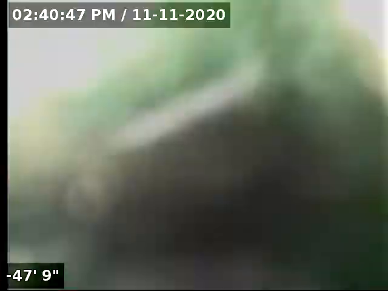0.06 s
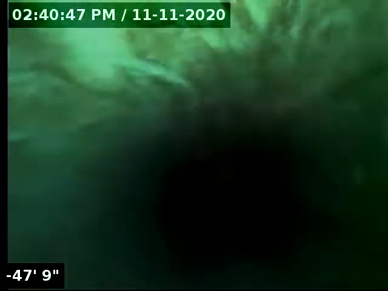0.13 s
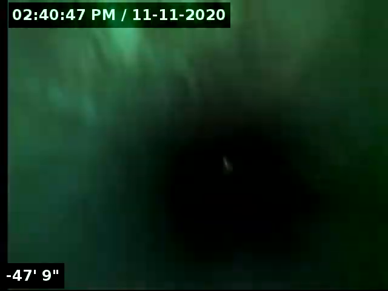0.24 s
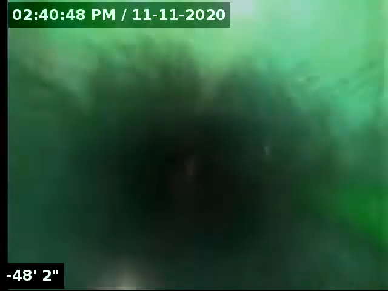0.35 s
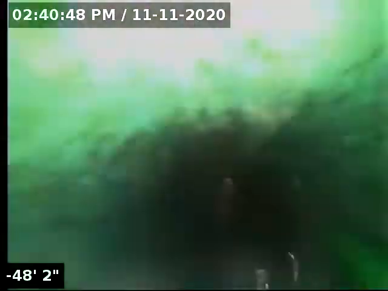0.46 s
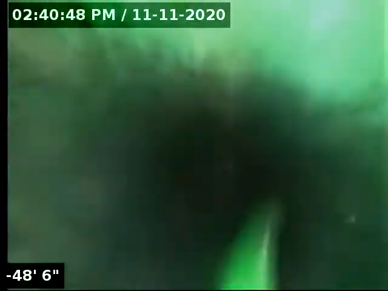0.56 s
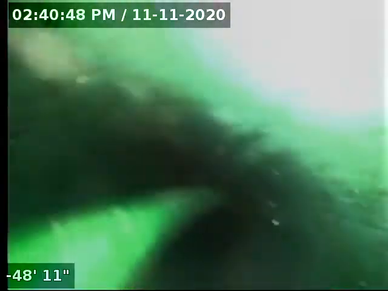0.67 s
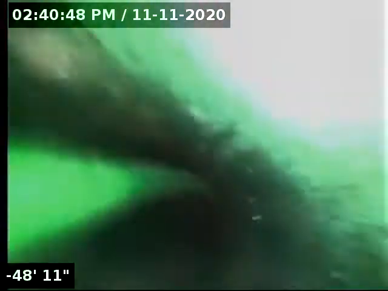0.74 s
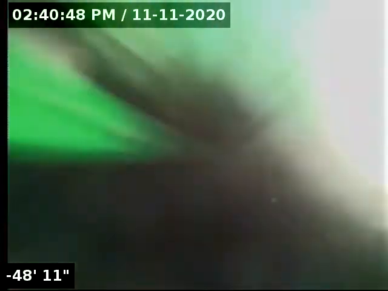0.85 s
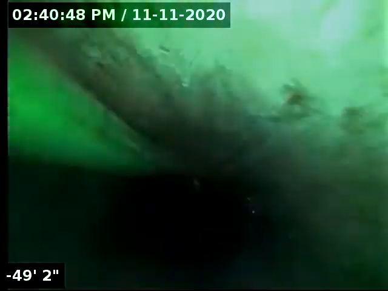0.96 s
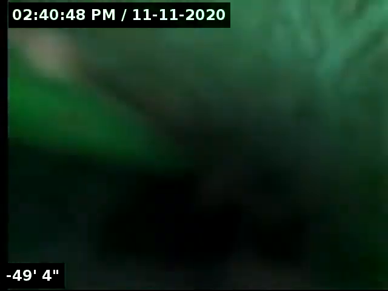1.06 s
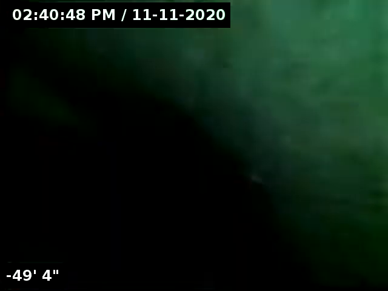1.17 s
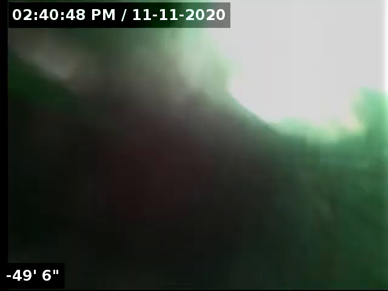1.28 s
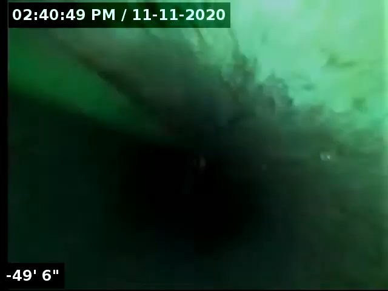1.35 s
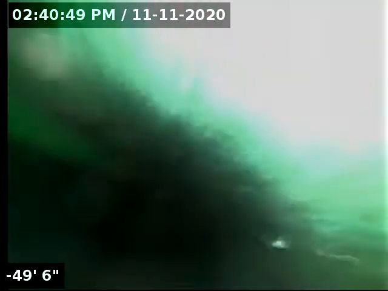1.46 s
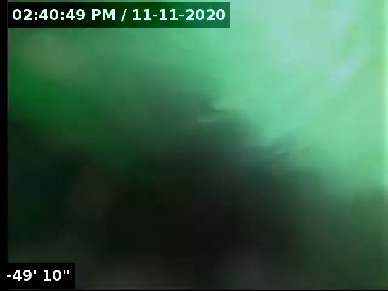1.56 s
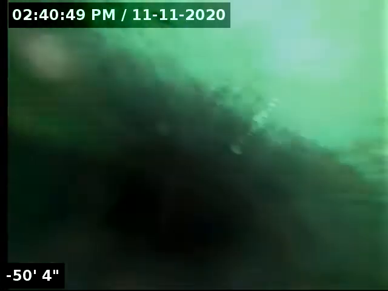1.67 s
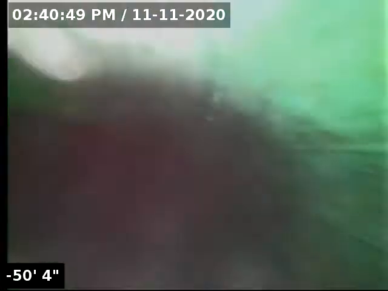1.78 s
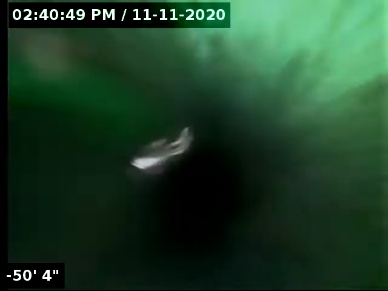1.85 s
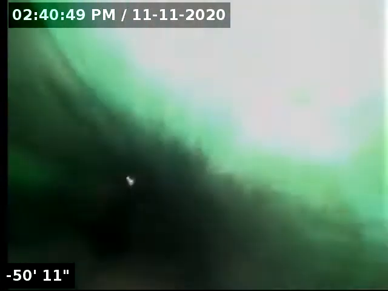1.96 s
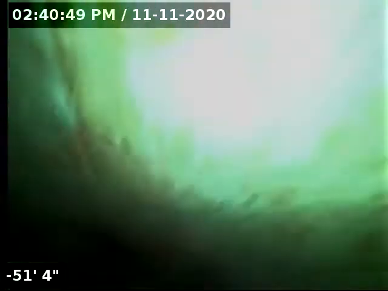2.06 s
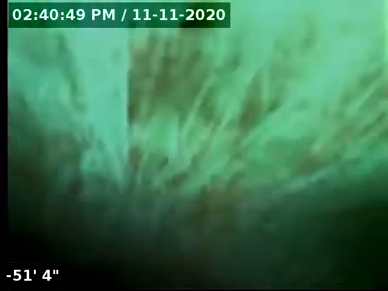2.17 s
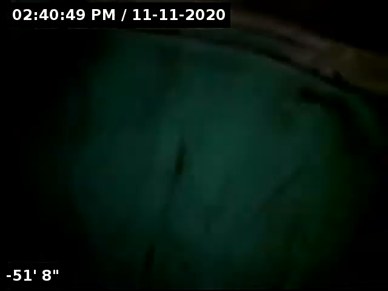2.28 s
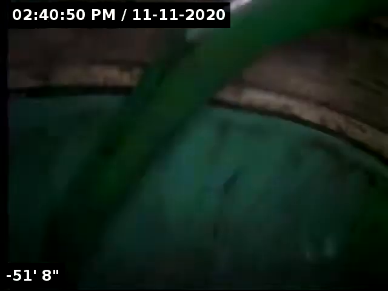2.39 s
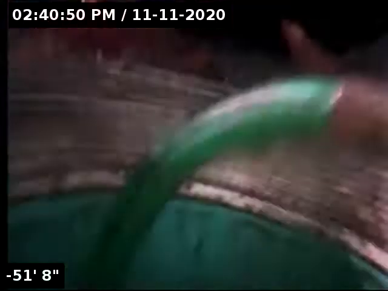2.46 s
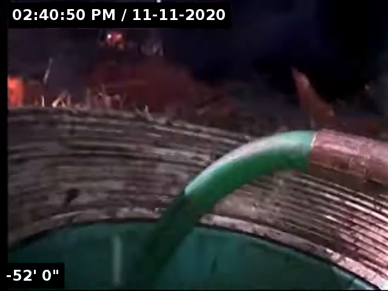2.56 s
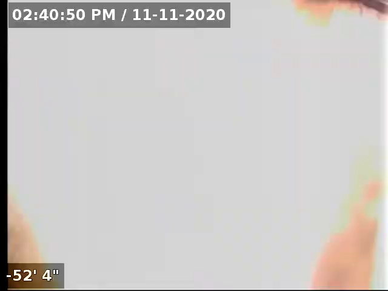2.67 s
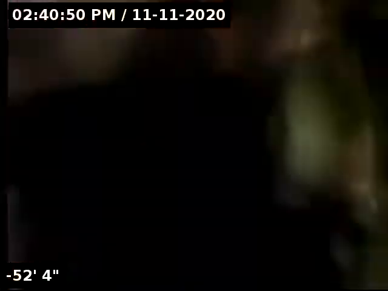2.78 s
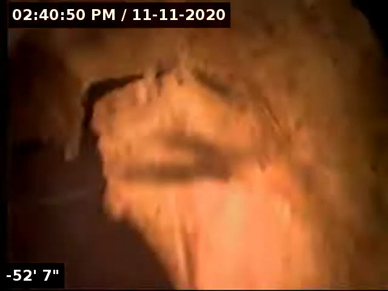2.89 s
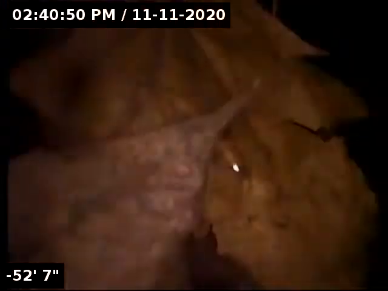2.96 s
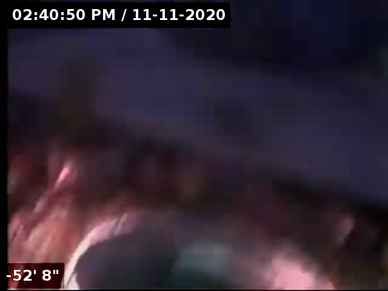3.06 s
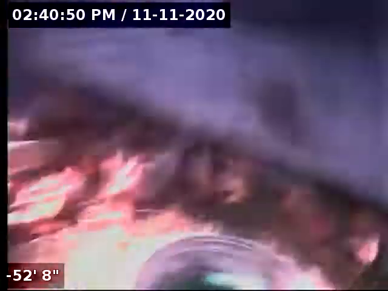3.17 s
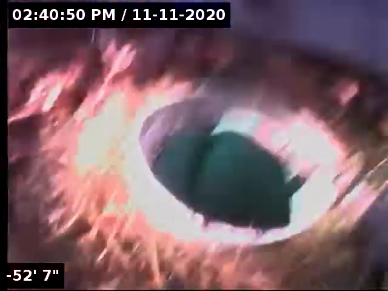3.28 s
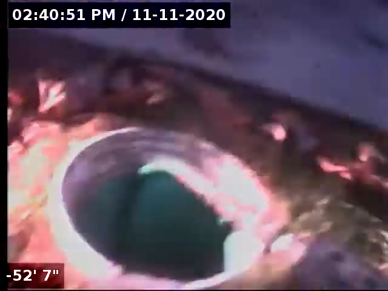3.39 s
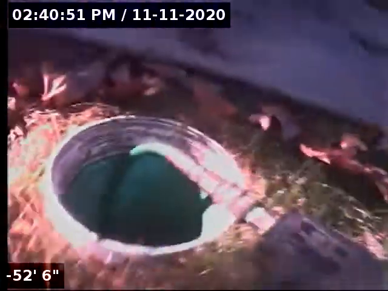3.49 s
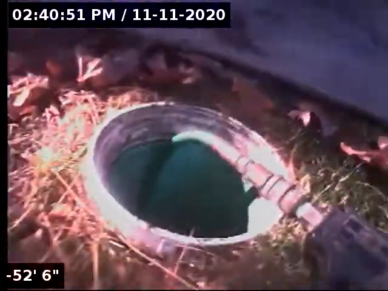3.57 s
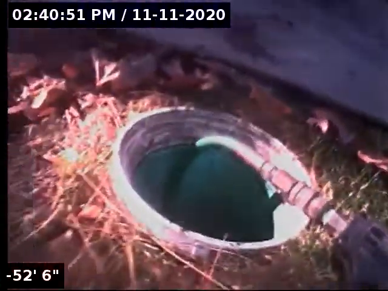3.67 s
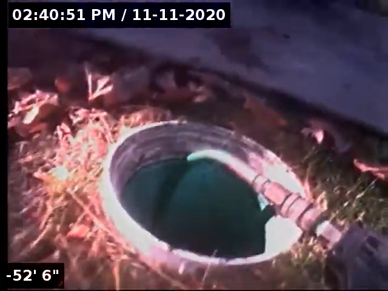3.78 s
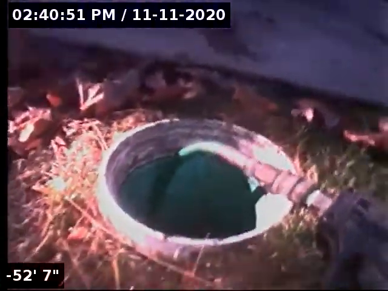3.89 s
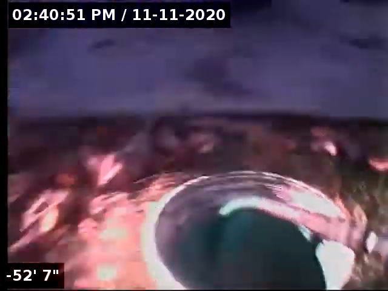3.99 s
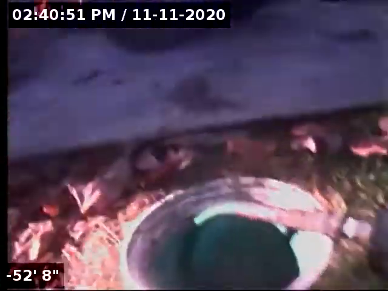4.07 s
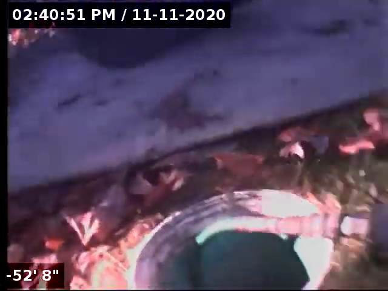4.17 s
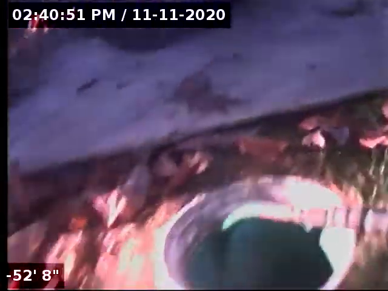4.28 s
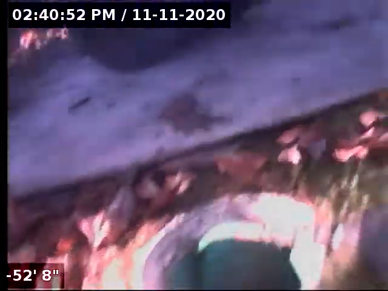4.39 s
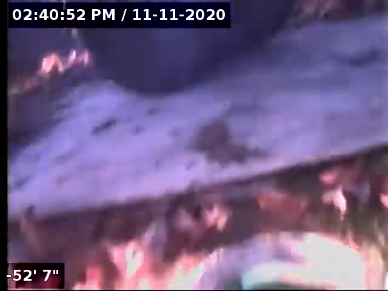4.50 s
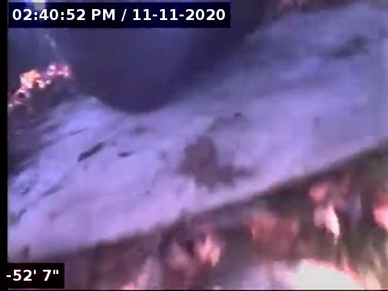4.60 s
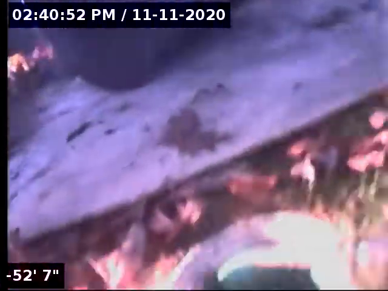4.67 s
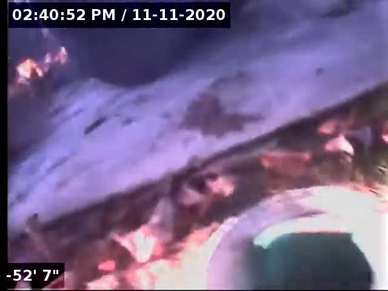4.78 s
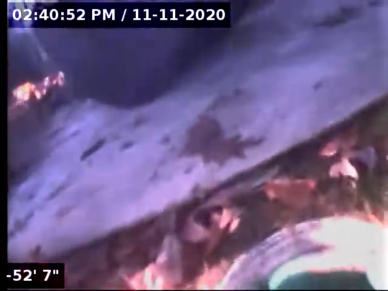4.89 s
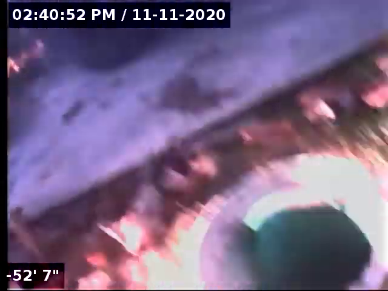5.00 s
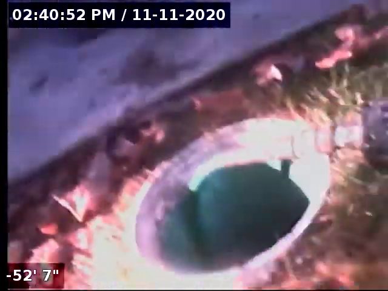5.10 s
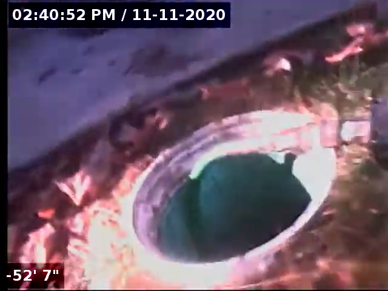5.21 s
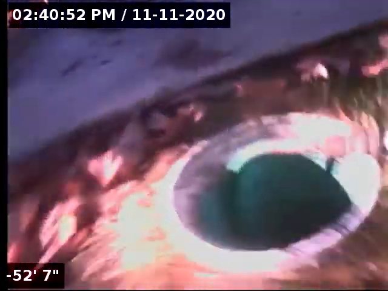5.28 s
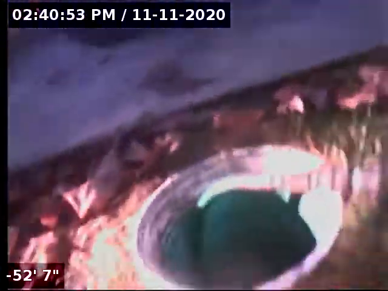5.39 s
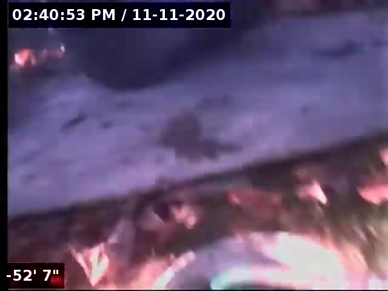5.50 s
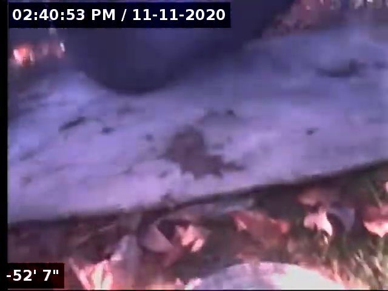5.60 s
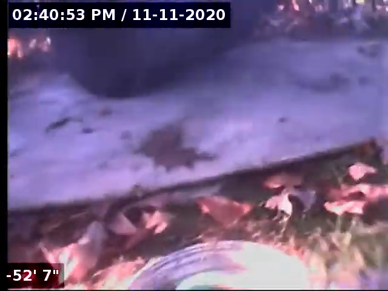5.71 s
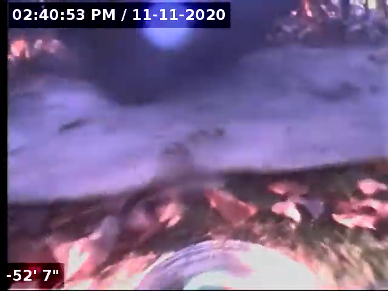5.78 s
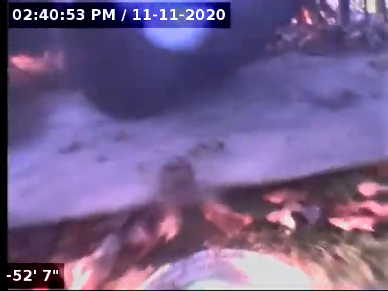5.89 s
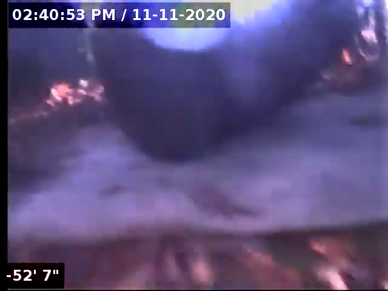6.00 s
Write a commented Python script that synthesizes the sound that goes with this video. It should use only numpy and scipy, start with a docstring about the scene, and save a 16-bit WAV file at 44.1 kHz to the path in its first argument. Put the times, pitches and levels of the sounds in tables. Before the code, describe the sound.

A steady, muffled rush with thin electronic hiss runs throughout, heard by one close, dull, slightly overloaded microphone. From 0 to 2 seconds a hard camera head is dragged through a plastic drain pipe: gritty scraping, low rumbling bumps, and cable swishes in short strokes whose tone climbs. Soft hollow knocks at 0.2 and 0.36 give way to stronger ones near 1.0, 1.25, 1.55 and 1.86. At about 2.05 a sharp knock leads into a dense, dry clatter over the rim until 2.6, with a brief hollow groan near 2.4. A boomy knock lands at 2.75, a loud one at 3.18, then scraping and small bumps to 3.45. After a lull, the loudest hollow knock strikes at 4.0, followed by two cable swishes and soft scuffs until 4.45. Mostly hiss remains to 6 seconds, with faint ticks and brushes near 4.8, 5.55, 5.7 and 5.9.

```python
"""The head of an inspection camera is pulled out of a plastic drain pipe: it scrapes along the wall, knocks at
the joints, rattles and groans over the rim, then brushes about in the open. Blows and random slips drive the
resonances of pipe and head. The push cable hisses in strokes, as shaped noise with two climbing resonances.
One microphone on a narrow-band, slightly overloaded recorder picks it all up over a background hiss."""
import sys
import numpy as np
from scipy import signal
from scipy.fft import rfft, irfft
from scipy.io import wavfile
from scipy.ndimage import uniform_filter1d

SR = 44100
rng = np.random.default_rng(int(sys.argv[2]) if len(sys.argv) > 2 else 0)


def store_pcm(level_fs):
    """Save levels as 16-bit WAV."""
    pcm = np.round(np.clip(level_fs, -1, 1) * 32767).astype(np.int16)
    wavfile.write(sys.argv[1], SR, np.atleast_2d(pcm).T)


N = 266805
TIME = np.arange(N) / SR

# modes of the pipe and the head in it, from low to high: f/Hz, width/Hz, level/dB
PIPE_MODES = [(118.2, 6, -0.5), (159, 10.6, 2.5), (189.6, 16.8, 3.5), (233.5, 51, -5), (311.7, 19, 5),
              (395, 41, -5.5), (523, 87, -4.5), (618.4, 76, -2), (697, 60, -1), (872, 79, -8.5),
              (1149, 200, -8), (1452, 109, -5), (1650, 107, -4), (2300, 545, -11), (2560, 180, -9),
              (2920, 300, -19)]
# hand-over-hand pulls of the cable, levels before the cable's own trim: start t/s, end t/s, level at start/dB,
# change by the end/dB, upper resonance at start f/Hz, lower resonance at start f/Hz, its relative level/dB
CABLE_PULLS = [(-0.05, 0.28, -53.5, -10, 5820, 2600, -5), (0.41, 0.64, -51, -2.5, 5400, 2860, -3.5),
               (0.64, 1.02, -55, 2, 6050, 2720, -7), (1.15, 1.749, -55.5, -10, 5900, 2550, -7),
               (1.769, 2.141, -46, -4.5, 5400, 2550, -2.5), (2.221, 2.628, -53.5, -6, 5996, 2700, -2),
               (2.65, 2.93, -50.5, -1, 5930, 2636, -1.5), (3.094, 3.32, -59, -1, 6000, 2740, -7),
               (4.063, 4.249, -52.5, -4.5, 6200, 2895, -7.5), (4.252, 4.419, -48, -18.5, 5900, 2860, -4.5)]


def undb(db):
    """Decibels to gain."""
    return 10 ** (np.asarray(db) / 20)


def unit(x):
    """Scale to an rms of 1."""
    return x / np.sqrt(np.mean(x ** 2) + 1e-18)


def colour(x, spectrum):
    """Shape a sound by (f/Hz, level/dB) points, falling steeply outside them, to an rms of 1."""
    hz, db = np.transpose(spectrum)
    log_f = np.log(np.fft.rfftfreq(len(x), 1 / SR) + 1)
    outside = np.abs(log_f - np.clip(log_f, np.log(hz[0]), np.log(hz[-1])))
    gain = undb(np.interp(log_f, np.log(hz), db) - 80 * outside)
    return unit(irfft(rfft(x) * gain, len(x)))


def soften(x, hz):
    """Steep low-pass."""
    return signal.sosfilt(signal.butter(6, hz, fs=SR, output="sos"), x)


def ring(x, modes, detune=1):
    """Drive a set of resonances; neighbours swing in opposite senses."""
    total = 0
    for k, (hz, width, db) in enumerate(modes):
        resonator = signal.iirpeak(hz * detune, hz / width, SR)
        total = total + (-1) ** k * undb(db) * signal.lfilter(*resonator, x)
    return total


def favour(modes, centre_hz, slope_db):
    """The place of contact favours the modes near one pitch; the others lose slope_db an octave."""
    return [(hz, width, db - slope_db * abs(np.log2(hz / centre_hz))) for hz, width, db in modes]


def walk(rate):
    """Smooth random wander with an rms of 1, heading for a new value rate times a second."""
    hold = int(SR / rate)
    steps = np.repeat(rng.standard_normal(N // hold + 1), hold)
    return unit(uniform_filter1d(steps, hold)[:N])


def grit(per_second, spread_db):
    """Tiny slips of uneven size at random moments."""
    slips = rng.random(N) < per_second / SR
    return slips * rng.standard_normal(N) * undb(spread_db * rng.standard_normal(N))


def whistle(hz, width_hz):
    """Noise in one resonance whose centre follows hz, at an rms of 1."""
    noise = rng.standard_normal(N) + 1j * rng.standard_normal(N)
    narrow = signal.lfilter(*signal.butter(2, width_hz / 2, fs=SR), noise)
    return unit(np.real(narrow * np.exp(2j * np.pi * np.cumsum(hz) / SR)))


def swells(table):
    """Gain that rises and falls smoothly around each (t/s, level/dB, half length/s)."""
    return sum(undb(db) * np.exp(-((TIME - s) / half) ** 2) for s, db, half in table)


def add(out, s, sound):
    """Mix a sound in at time s."""
    i = int(s * SR)
    out[i:i + len(sound)] += sound[:N - i]


def hiss():
    """Background rush that wavers slightly, with a thin, steady electronic hiss on top."""
    # the background rush: f/Hz, level/dB
    rush_spectrum = [(15, -43), (25, -26.5), (112, -5), (196, -6.5), (279, -3), (323, -7.5), (358, -4.5),
                     (450, -9.5), (726, -11.5), (1080, -16), (1470, -16), (2530, -24), (3110, -29.5),
                     (3600, -40), (4680, -72), (7920, -120)]
    # the thin hiss above it: f/Hz, level/dB
    top_spectrum = [(3600, -40), (4500, -14.5), (5600, -10), (6400, -4.5), (6900, -4), (7400, -9.5),
                    (8000, -17.5), (8800, -29)]
    rush_db, waver_db, top_db = -49, 0.9, -68
    rush = colour(rng.standard_normal(N), rush_spectrum) * undb(rush_db + waver_db * walk(9))
    return rush + colour(rng.standard_normal(N), top_spectrum) * undb(top_db)


def cable(level_db=3, upper_db=-6.5, waver_db=1.5, attack_s=0.058, release_s=0.025, rise_octaves_per_s=0.42):
    """The sliding cable hisses on every pull: a quick start, a gradual level change and a quick stop."""
    # friction of the sliding cable: f/Hz, level/dB
    friction_spectrum = [(300, -1.5), (900, -5), (1600, -2.5), (2100, -4.5), (3000, -1.5), (3500, -10),
                         (4500, -10.5), (5700, -6.5), (6800, -10.5), (7500, -10), (8600, -29)]
    pull, voicing = np.zeros(N), np.zeros((3, N))
    for start, end, db, change_db, upper_hz, lower_hz, lower_db in CABLE_PULLS:
        held = np.clip(TIME - start, 0, end - start)
        gate = np.minimum(held / attack_s, 1) * np.exp(-np.maximum(TIME - end, 0) / release_s)
        pull += gate * undb(db + change_db * held / (end - start))
        # both resonances climb through the pull, then stay put until the next
        climb = 2 ** (rise_octaves_per_s * held)
        pull_voicing = [upper_hz * climb, lower_hz * climb, np.full(N, lower_db)]
        voicing = np.where(TIME >= start, pull_voicing, voicing)
    upper, lower, lower_db = voicing
    tone = undb(lower_db) * whistle(lower, width_hz=490) + undb(upper_db) * whistle(upper, width_hz=1270)
    friction = colour(rng.standard_normal(N), friction_spectrum)
    return undb(level_db + waver_db * walk(35)) * pull * (friction + tone)


def scrape(rumble_db=-47, rumble_follows=0.85, firm_drag_db=-46, stall_db=-4.5, stall_lag_s=0.033, stall_half_s=0.03):
    """The dragged head catches and slips on the wall, driving the pipe modes; rough patches add rumble."""
    # how hard the head drags until it is lifted clear, before the stalls: t/s, rasp level/dB
    drag_points = [(0, -46), (0.42, -46.5), (0.66, -57), (0.87, -45), (1.25, -42.5), (1.42, -47.5),
                   (1.68, -42), (1.95, -41), (2.43, -40.5), (2.53, -48.5), (3.08, -58.5), (3.22, -43.5),
                   (3.55, -58)]
    # rough patches that make the dragged head rumble: middle t/s, level/dB, half length/s
    patches = [(0.23, -50, 0.033), (0.39, -50, 0.041), (0.58, -53.5, 0.05), (0.92, -39.5, 0.081),
               (1.11, -38, 0.021), (1.245, -39, 0.053), (1.83, -46, 0.1), (2.12, -44, 0.047),
               (2.39, -42, 0.044), (3.17, -40.5, 0.017), (3.29, -41, 0.044), (3.42, -39.5, 0.045)]
    # the head stalls for a moment after each pull
    stall = sum(np.exp(-((TIME - end - stall_lag_s) / stall_half_s) ** 2) for _, end, *_ in CABLE_PULLS)
    drag_db = np.interp(TIME, *np.transpose(drag_points), right=-120) + stall_db * stall
    # rumble_db holds under a firm drag and follows the drag from there
    rumble = undb(rumble_db + rumble_follows * (drag_db - firm_drag_db)) + swells(patches)
    low, high = PIPE_MODES[:10], PIPE_MODES[10:]
    bumps = unit(ring(grit(per_second=1200, spread_db=1.0) * undb(2 * walk(40.15)), low))
    rasp = soften(ring(grit(per_second=6000, spread_db=2), high), hz=3600)
    slips = unit(rasp * undb(walk(45)))
    return rumble * bumps + undb(drag_db) * slips


def chatter(t, contact_s, tail_db, tail_s):
    """Force of one blow: random kicks as the head judders for a few ms, then a longer, decaying tail of them."""
    swell = (.5 + t / contact_s) * np.exp(-t / contact_s)
    return rng.choice([-1., 1.], len(t)) * (swell + undb(tail_db) * np.exp(-t / tail_s))


def blow(sound, db):
    """Set the rms level of the loudest 10 ms of a short sound."""
    return sound * undb(db) / np.sqrt(uniform_filter1d(sound ** 2, size=441).max())


def knocks(boom_lag_s=0.00435, body_lag_s=0.00059, boom_trim_db=-1.1, body_trim_db=-1.0,
           clack_trim_db=2.5, crack_trim_db=1.5, strike_db=12):
    """Each knock rings the low, middle and high modes by its own share; the boom of the pipe arrives last."""
    # knocks of the head, levels before the trims: t/s, boom of the pipe level/dB, hollow body level/dB,
    # clack of the head level/dB, treble crack level/dB, boom f/Hz, clack f/Hz
    blows = [(0.196, -32.5, -34.5, -50, -67, 185, 1900), (0.357, -35.5, -43.5, -50, -73, 190, 1510),
             (0.712, -44, -39.5, -53, -64, 212, 1500), (0.855, -36, -30.5, -49, -56, 217, 1200),
             (0.9764, -24.5, -24, -31, -61, 176, 1900), (1.092, -32.5, -34, -55, -64, 287, 2000),
             (1.230, -26.5, -29, -37.5, -68, 293, 1570), (1.314, -36.5, -38, -33.5, -57, 194, 1440),
             (1.5546, -24, -26.5, -22, -34.5, 269, 1250), (1.86, -35, -23.5, -28, -45, 200, 2000),
             (2.053, -26, -24, -21, -35, 205, 2470), (2.748, -22, -28.5, -24, -47, 195, 1445),
             (3.179, -22.5, -16, -22.5, -38.5, 260, 1280), (3.396, -50, -39, -55, -72, 263, 1500),
             (3.422, -38, -31, -27, -68, 242, 1050), (3.438, -43, -38, -37, -44, 217, 1360),
             (4.0061, -23.5, -14, -19.5, -32.5, 273, 1320)]
    # treble crack: f/Hz, level/dB
    crack_spectrum = [(2500, -20), (3500, -1.5), (4600, -5), (6300, 4), (7400, -2.5), (8600, -22)]
    out, t = np.zeros(N), np.arange(SR // 5) / SR
    low, middle, high = PIPE_MODES[:6], PIPE_MODES[6:10], PIPE_MODES[10:]
    push = np.exp(-t / 0.00055)
    strike = undb(strike_db) * signal.unit_impulse(len(t), SR // 1000)  # 1 ms in
    for s, boom_db, body_db, clack_db, crack_db, boom_hz, clack_hz in blows:
        detune = 1 + .01 * rng.standard_normal()  # no two blows are quite alike
        force = push + undb(-10.5) * chatter(t, contact_s=0.0036, tail_db=-6.5, tail_s=0.02)
        judder = strike + chatter(t, contact_s=0.003, tail_db=-13.5, tail_s=0.015)

        boom = ring(force, favour(low, boom_hz, slope_db=10.5), detune)
        body = ring(force, favour(middle, centre_hz=575, slope_db=11.5), detune)
        clack = ring(judder, favour(high, clack_hz, slope_db=0.5), detune)
        clack = clack + ring(judder, [(clack_hz, 200, -7)])  # f/Hz, width/Hz, level/dB
        clack = soften(clack, hz=3580)
        crack = colour(chatter(t, contact_s=0.0037, tail_db=-37.5, tail_s=.008), crack_spectrum)
        crack = crack * np.exp(-(t / 0.042) ** 2)

        add(out, s + boom_lag_s, blow(boom, boom_db + boom_trim_db))
        add(out, s + body_lag_s, blow(body, body_db + body_trim_db))
        add(out, s, blow(clack, clack_db + clack_trim_db) + blow(crack, crack_db + crack_trim_db))
    return out


def rattle(mean_gap_s=0.0065, fade_db_per_s=60, scatter_db=1):
    """(t/s, level/dB) of the head's bounces over the rim: each run is unevenly spaced and dies away."""
    # runs of lighter ticks, levels before scatter and the ticks' trim: start t/s, length/s, first level/dB
    runs = [(2.114, 0.075, -16.5), (2.253, 0.035, -19.5), (2.364, 0.07, -24.5)]
    bounces = []
    for start, length, db in runs:
        gaps, scatter = rng.uniform(.5, 1.5, 40), rng.standard_normal(40)
        after = mean_gap_s * (np.cumsum(gaps) - gaps[0])
        for s, z in zip(after, scatter):
            if s < length:
                bounces.append((start + s, db - fade_db_per_s * s + scatter_db * z))
    return bounces


def ticks(level_db=-0.75):
    """Hard, light contacts, each a click with a little decaying noise, ring only for a moment."""
    # single ticks of the head on the wall and the rim: t/s, peak level before trim and softening/dB
    contacts = [(0.685, -33), (1.614, -22.5), (1.626, -22), (2.0988, -10), (2.115, -8.5), (2.1198, -7.5),
                (2.1334, -10), (2.162, -15.5), (2.267, -20), (2.3128, -24), (2.348, -16.5), (2.372, -17.5),
                (2.380, -12.5), (2.465, -24.5), (2.5212, -15), (2.539, -13), (2.551, -19), (2.579, -26),
                (4.795, -31), (5.678, -46), (5.907, -37)]
    # short ring of a tick: f/Hz, width/Hz, level/dB
    tick_modes = [(44.7, 76, -20), (292, 28, -2.5), (483, 67, 1.5), (814, 284, -2.5), (1425, 193, 4.5),
                  (1692, 326, 0.5), (2106, 330, -6), (2955, 180, -4), (3385, 700, -18), (6200, 2200, -28.5)]
    out, t = np.zeros(N), np.arange(SR // 12) / SR
    for s, db in [*contacts, *rattle()]:
        force = undb(-28.0) * rng.standard_normal(len(t)) * np.exp(-t / 0.0061)
        force[0] += 1
        sound = ring(force, tick_modes, 1 + 0.025 * rng.standard_normal())
        add(out, s, undb(db + level_db) * sound / np.abs(sound).max())
    return soften(out, hz=6760)


def groan(middle_s=2.415, half_s=0.035, pitch_hz=525, level_db=-35):
    """The head rubs over the rim and briefly keeps one hollow mode going, as narrow noise."""
    swell = np.exp(-((TIME - middle_s) / half_s) ** 2)
    return undb(level_db) * swell * whistle(np.full(N, pitch_hz), width_hz=43)


def brushes():
    """Short, soft scuffs of fine grit as the head is moved about."""
    # light brushes of the head in the open: middle t/s, level/dB, half length/s
    scuffs = [(3.145, -47, 0.01), (4.297, -52, 0.032), (4.354, -51.5, 0.035), (4.417, -54, 0.019),
              (4.773, -51, 0.0091), (5.541, -54, 0.017), (5.853, -56, .006)]
    # spectrum of a brush: f/Hz, level/dB
    scuff_spectrum = [(900, -30), (1500, 5), (2100, 4.5), (3000, -3.5), (3600, -14)]
    return swells(scuffs) * colour(grit(per_second=1300, spread_db=1.5), scuff_spectrum)


def scene():
    """All sources at one microphone."""
    return (hiss() + cable() + scrape() + knocks() + ticks() + groan() + brushes())[None]


def record(dry, lopsided=0.91, notch_width_hz=700, top_hz=8834):
    """The input stage bends loud peaks to one side; the recorder has a deep notch at 4 kHz and a dull top."""
    bent = dry + lopsided * dry ** 2
    bent = signal.sosfilt(signal.butter(1, 18, "high", fs=SR, output="sos"), bent)
    notched = signal.lfilter(*signal.iirnotch(4000, 4000 / notch_width_hz, SR), bent)
    band_limit = signal.ellip(8, .2, 50, top_hz, fs=SR, output="sos")
    return signal.sosfilt(band_limit, soften(notched, hz=8300))


dry = scene()
out = record(dry)
store_pcm(out)
```